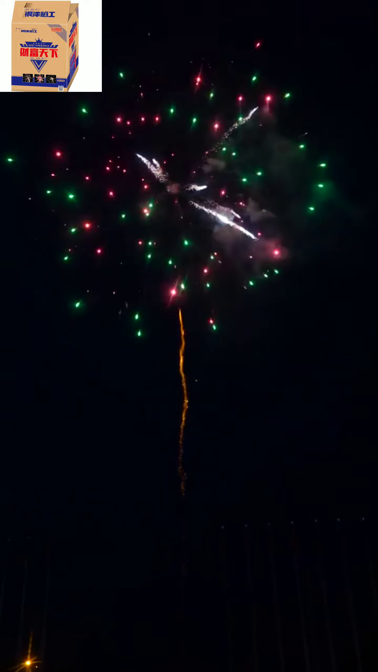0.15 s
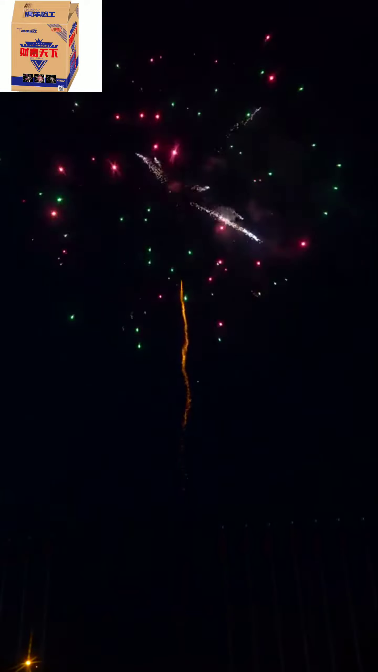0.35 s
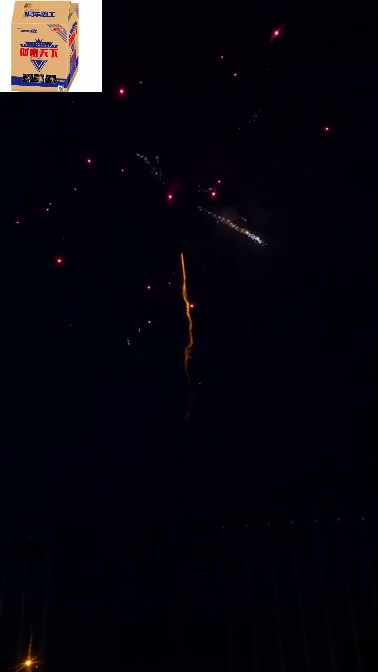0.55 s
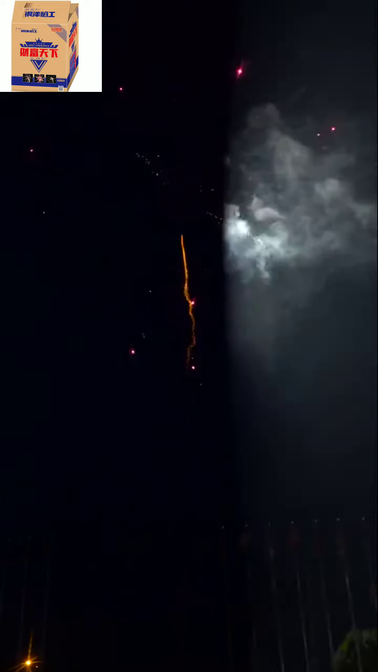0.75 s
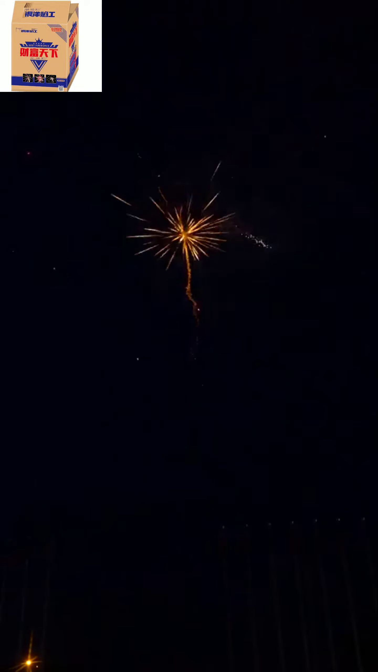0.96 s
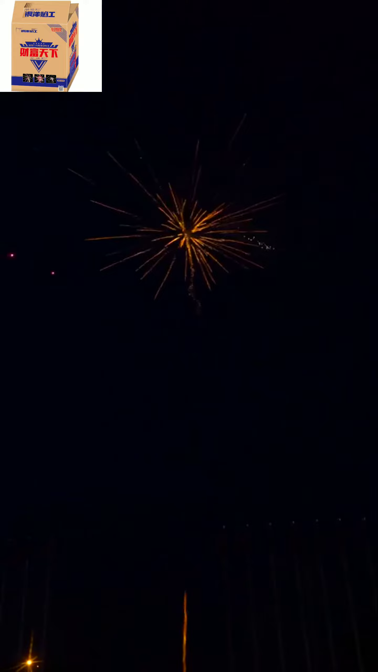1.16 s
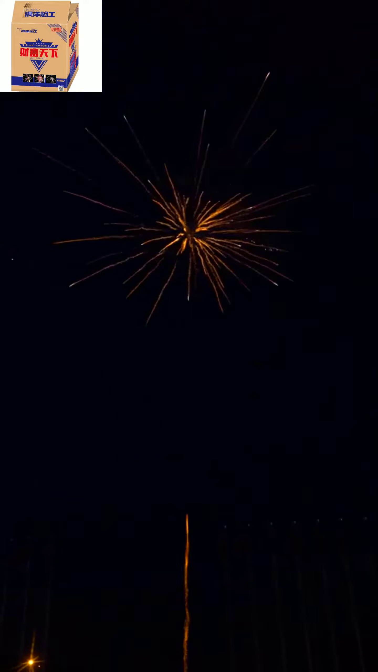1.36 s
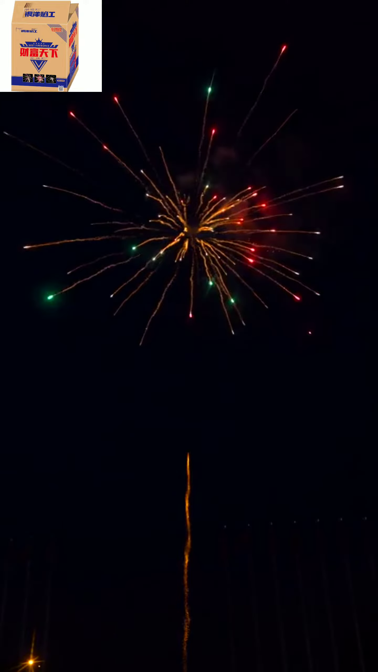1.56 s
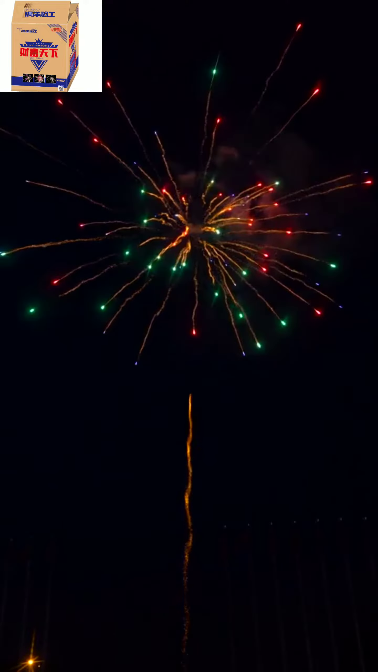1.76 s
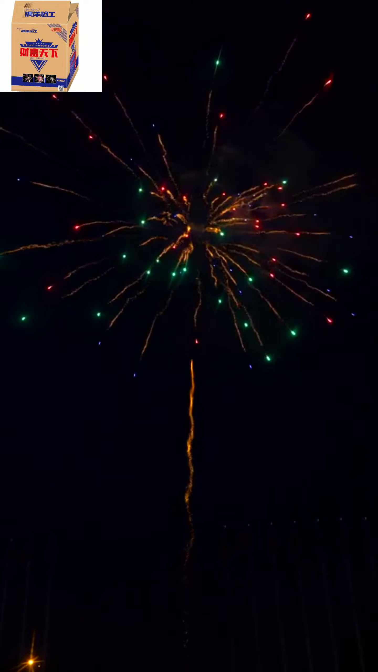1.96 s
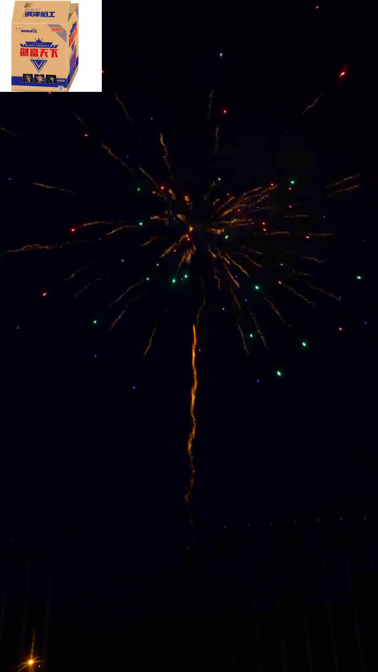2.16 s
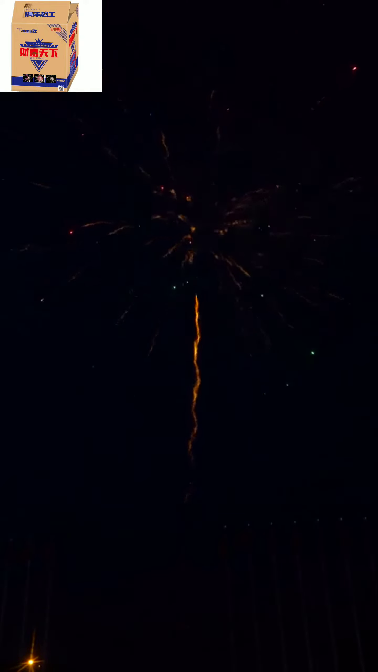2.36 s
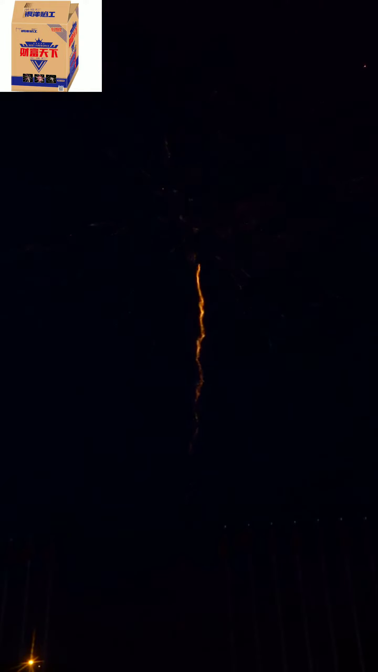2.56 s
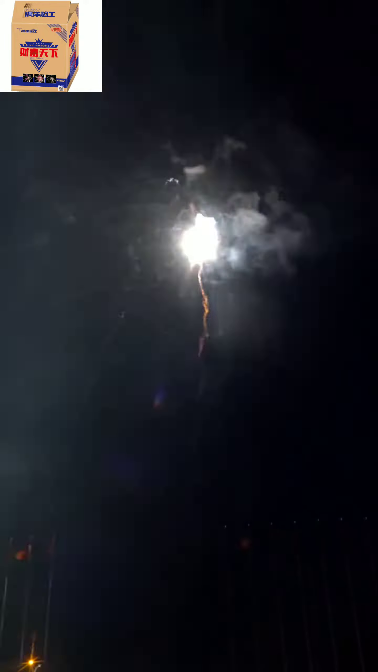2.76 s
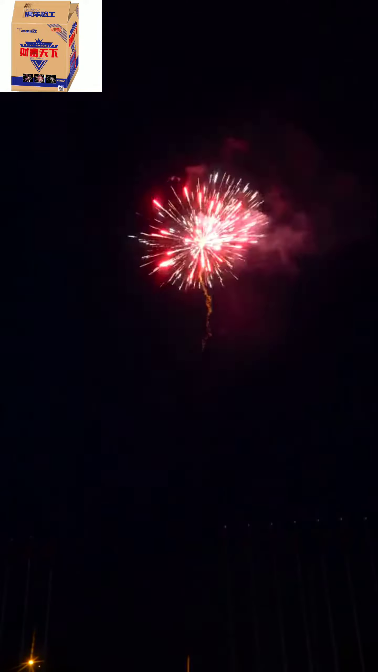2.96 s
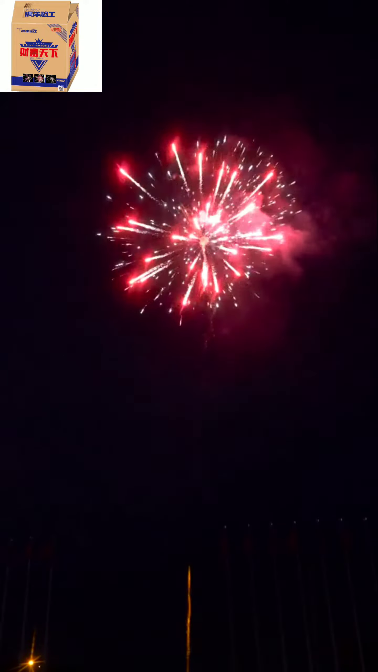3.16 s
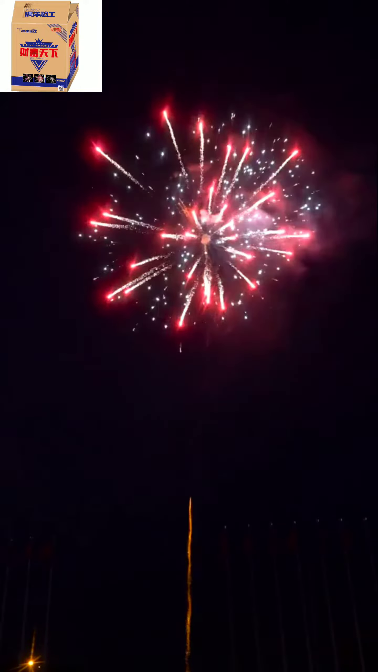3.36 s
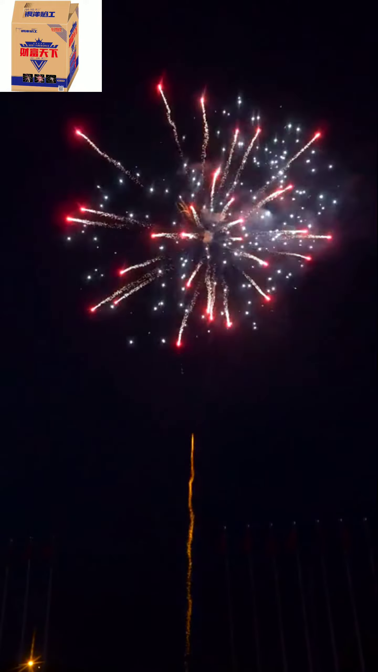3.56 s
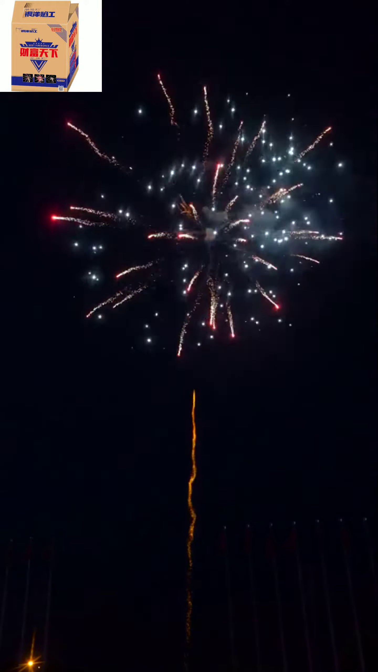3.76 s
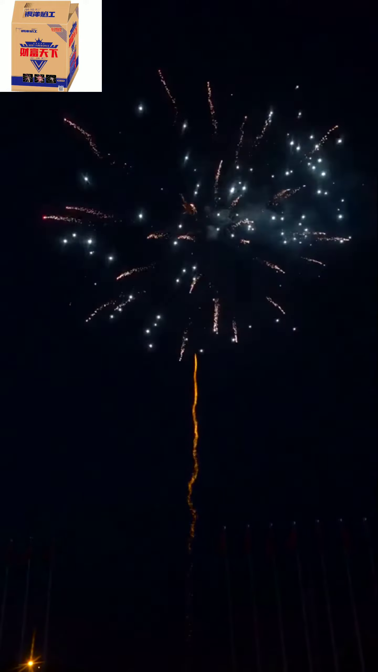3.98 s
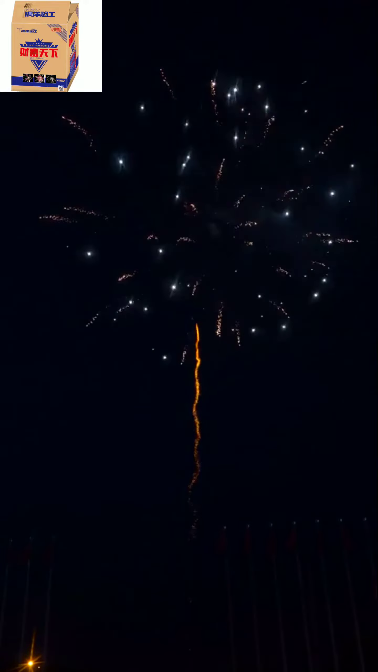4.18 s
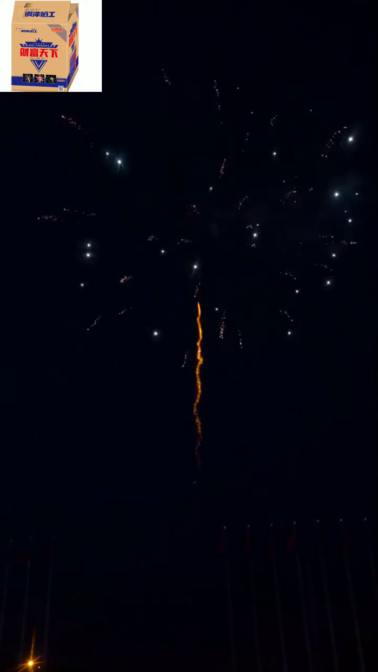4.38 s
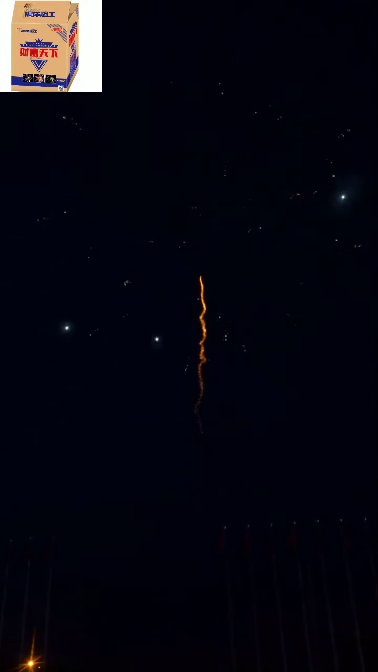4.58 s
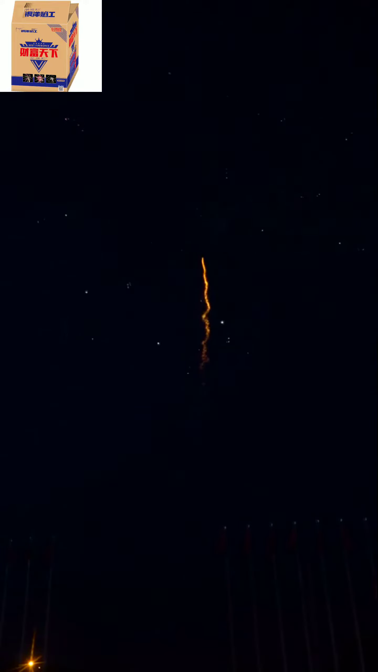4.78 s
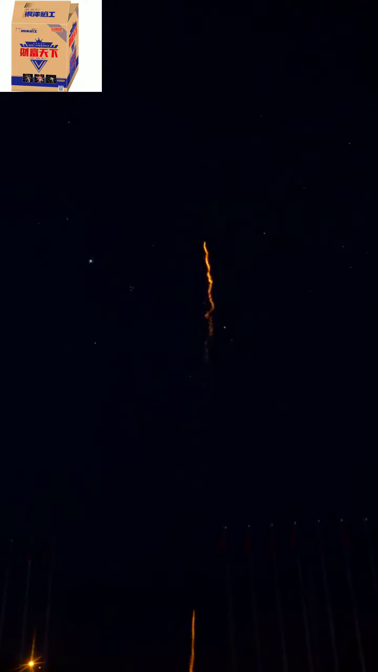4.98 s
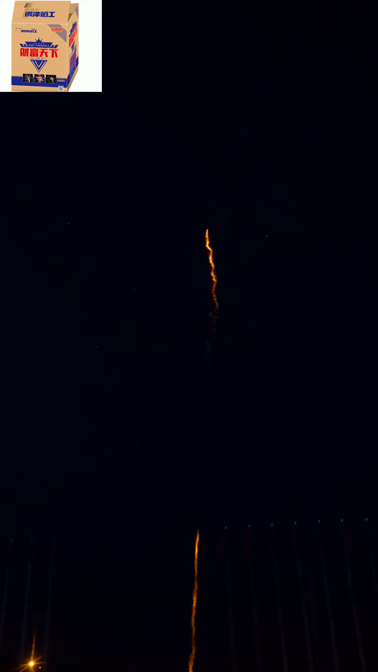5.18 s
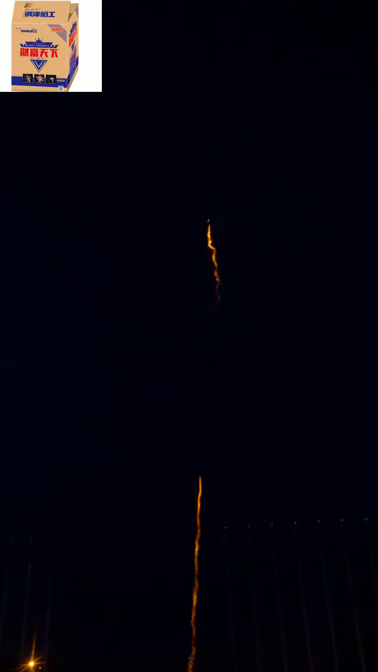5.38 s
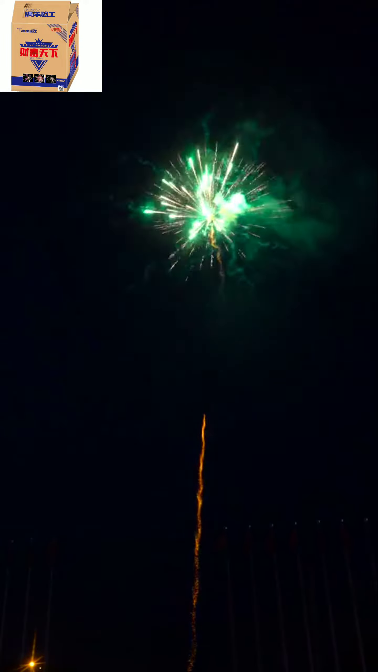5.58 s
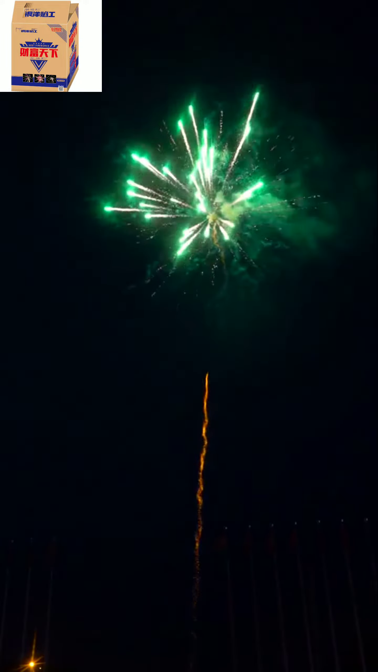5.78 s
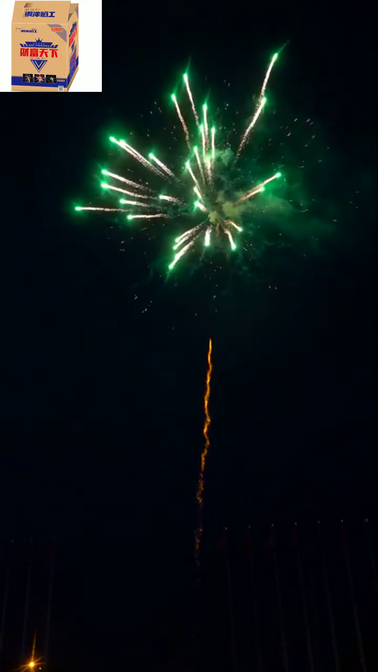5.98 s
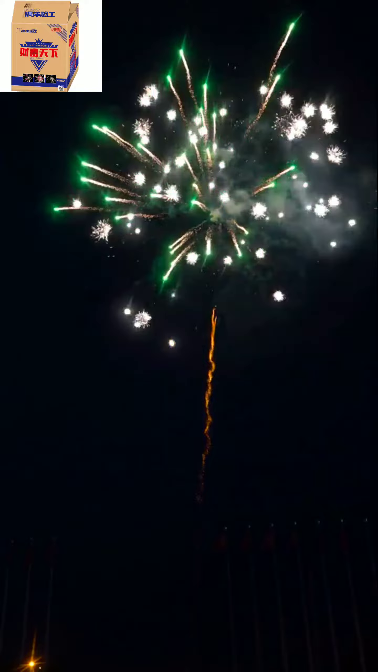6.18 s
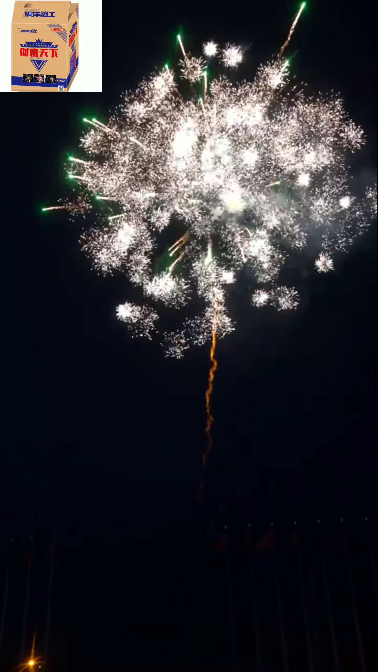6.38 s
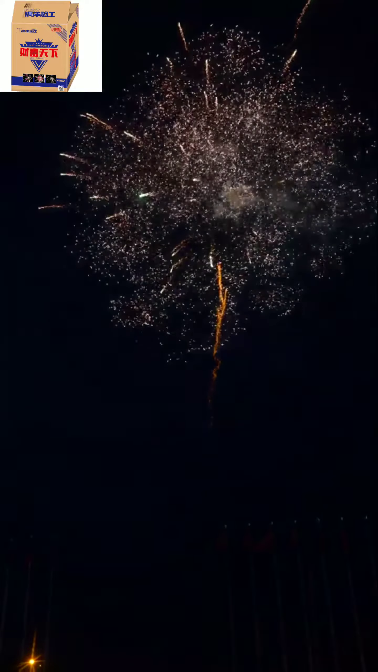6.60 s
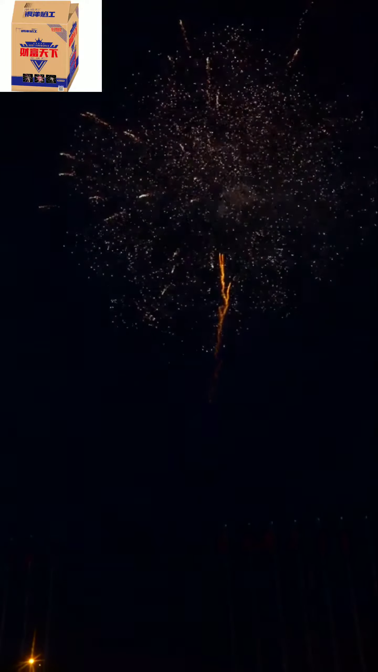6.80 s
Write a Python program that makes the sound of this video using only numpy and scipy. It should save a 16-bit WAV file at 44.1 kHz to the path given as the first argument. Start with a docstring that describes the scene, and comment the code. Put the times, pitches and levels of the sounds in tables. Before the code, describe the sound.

Three sharp firework bangs go off overhead in the open air, after the fading tail of an earlier one. The first two come right on top of a launch thump, while the third follows its thump after a short gap. Each echoes quickly off nearby surfaces and rolls away, and a rush of crackling pops closes the sequence. Distant fireworks, a faint engine drone and low outdoor rumble lie behind.

```python
"""A firework cake at night. First a shell's bang rolls away and its stars sizzle, over low outdoor rumble,
far fireworks and a distant engine slowly gaining speed. Three times a lift charge thumps in its tube,
and three more shells burst overhead. The same walls and trees slap each shock back before it rolls
away over the landscape; stray stars snap in between. The last shell ends in a cloud of crackling stars."""
import sys
import numpy as np
from scipy import signal
from scipy.io import wavfile
from scipy.ndimage import uniform_filter1d

SR = 44100
rng = np.random.default_rng(int(sys.argv[2]) if len(sys.argv) > 2 else 0)


def bounce(signal):
    """Save signal as a 16-bit WAV file at the path given by the first command-line argument."""
    frames = np.transpose(np.atleast_2d(signal))
    limited = np.clip(frames, -1, 1)
    pcm = np.round(limited * 32767).astype(np.int16)
    wavfile.write(sys.argv[1], SR, pcm)


N = 301628

# Source spectra: (frequency [Hz], relative level [dB])
RUMBLE_SPECTRUM = [(25, -34.5), (50, -33.5), (80, 0.5), (150, 5.5), (260, 1), (450, -15), (700, -11),
                   (1100, -16), (2000, -24.5), (4000, -36.5), (5500, -47.5), (7500, -43.5), (9000, -54)]
SIZZLE_SPECTRUM = [(1000, -19), (3500, 4), (5500, -5), (8000, -4), (10000, -26)]
SNAP_SPECTRUM = [(200, -25), (1200, -2), (2500, 2), (6000, 0), (8500, -6.5), (10000, -26)]
POP_SPECTRUM = [(100, -29), (400, -1.5), (700, -1), (1100, -0.5), (2100, -3), (3200, -7.5), (5000, -13.5),
                (8000, -17), (10000, -33)]
LIFT_CRACK_SPECTRUM = [(100, -16.5), (500, 2.5), (1200, 6), (2200, 3.5), (3200, -2.5), (6000, -14),
                       (8300, -8), (10000, -34)]
BURST_CRACK_SPECTRUM = [(100, -11), (500, 12), (1900, 2.5), (3000, -7.5), (6000, -12), (8500, -10.5),
                        (10000, -23)]
# Echo spectra: (frequency [Hz], relative level [dB])
FAR_ROLL_SPECTRUM = [(40, -24), (130, 2), (250, 7.5), (450, -3), (1300, -18), (2500, -35.5), (6000, -59)]
LIFT_ROLL_SPECTRUM = [(15, -55), (25, -55), (83, -3.5), (177, 1.5), (470, -17.5), (546, -10.5), (836, -16),
                      (948, -16), (1070, -11.5), (1690, -19.5), (7400, -34.5), (10000, -49), (13000, -87),
                      (22000, -120)]
BURST_ROLL_SPECTRUM = [(15, -36), (25, -45), (75, -9.5), (168, 2), (264, 4.5), (414, -7.5), (470, -9.5),
                       (756, -10), (972, -16.5), (1250, -16), (2520, -25), (7980, -34), (8820, -35.5),
                       (10000, -53), (13000, -81), (22000, -120)]
SLAP_SPECTRUM = [(100, -15.5), (500, 6), (1900, 0), (3000, -5.5), (6000, -4.5), (8500, -1.5), (10000, -17)]
# Decay of near surroundings and far landscape: (frequency [Hz], T60 [s])
NEAR_T60 = [(60, 1.86), (250, 1.1), (1000, 1.18), (4000, 1.24), (9000, 0.89)]
FAR_T60 = [(60, 3.9), (250, 2.94), (1000, 3.62), (2500, 3.43), (5000, 2.19), (9000, 1.18)]
# Diffuse field width, and the extra for near echoes: (frequency [Hz], side minus mid [dB])
FIELD_WIDTH = [(60, -39.5), (140, -42), (280, -23.5), (560, -11), (1100, -8), (2200, -4), (4500, -0.5),
               (7700, -10)]
NEAR_EXTRA_WIDTH = [(60, 14.5), (140, 26), (280, 14), (560, 6), (1100, 2.5), (2200, 5.5), (4500, 2.5),
                    (7700, -0.5)]
# Near echoes, mostly from the right: (frequency [Hz], left minus right [dB])
NEAR_BALANCE = [(60, 0), (280, -3.5), (700, -5), (1200, -4.5), (2200, 3), (4500, -0.5), (7700, -4.5)]
# Engine loudness, drifting with the air: (time [s], level [dB])
ENGINE_LEVEL = [(0, -38.5), (.9, -35.5), (1.6, -41), (3.0, -39), (4.4, -44), (4.9, -41), (5.6, -53.5),
                (6.84, -46)]
# Far fireworks, and one small, nearer pop at 2.97 s: (time [s], blast [dB], push [s], low-pass [Hz], roll [dB])
FAR_BANGS = [(0.831, -21.5, 0.0026, 380, -41.5), (2.311, -22, 0.0035, 320, -46),
             (2.97, -26, 0.00074, 2500, -34.5), (4.607, -19.5, 0.0061, 480, -42.5),
             (5.459, -26, 0.0015, 700, -56), (5.528, -29, 0.0012, 700, -52)]
# Stray stars, and stars ahead of the cloud: (time [s], level [dB], left minus right [dB])
SNAPS = [(2.848, -43, -3), (2.854, -47, -9), (3.6469, -17, 2)]
EARLY_POPS = [(6.3892, -10.5, -4), (6.3952, -15, 10), (6.4201, -9, -2), (6.4222, -9, -6), (6.4253, -8, 16),
              (6.4457, -10, 6), (6.459, -7, -14)]
# Lift charges: (time [s], blast [dB], push [s], base crack [dB], slap re blast [dB], roll [dB])
LAUNCHES = [(1.0677, -11, 0.002, -11.5, -6, -24.5), (3.0006, -11, 0.004, -11, 1, -25),
            (4.957, -12.5, 0.0027, -11, 2, -23.5)]
# Shell bursts: (time [s], blast [dB], push [s], base crack [dB], roll [dB], roll tilt [dB/octave],
# roll hold [s], far echo re near [dB], far wall delay [s])
BURSTS = [(-.36, -4, .0012, -24, -16, 0.3, 0.17, -5, .28),
          (1.091, -7, 0.0012, -16, -16, 0.47, 0.18, -6, .279),
          (3.074, -5.5, 0.0013, -17, -15.5, 0.64, 0.2, -6, .272),
          (5.7035, -5.5, 0.00096, -15.5, -15, 0.65, 0.21, -6, 0.29)]
# Surfaces answering each lift: (delay [s], thump offset [dB], crack offset [dB])
LIFT_ECHOES = [(0.0802, -18.5, -15), (.111, -9.5, -10.5), (.128, -5.5, -2), (.165, -7.5, -16)]
# Surfaces answering each burst: (delay [s], thump offset [dB], crack offset [dB], crack low-pass [Hz],
# smear [s], left minus right [dB])
BURST_ECHOES = [(.008, -24.5, -16.5, 6070, 0.033, 2.5), (.031, -4, -4.5, 4800, 0.012, 2),
                (.058, -14.5, 2, 11000, 0.003, -4.5), (0.0877, -5.5, 0, 6460, 0.0016, -3),
                (.102, -5, -5, 5500, .003, -9), (.1285, -4, -0.5, 3210, 0.0021, -7),
                (.154, -10, 3.5, 2700, 0.0038, 6)]
# Far wall answering each burst: (thump offset [dB], crack offset [dB], crack low-pass [Hz])
WALL_ECHO = (-3.5, 5.3, 870)


def amp(db):
    return 10 ** (np.asarray(db) / 20)


def unit_rms(x):
    return x / np.sqrt(np.mean(x ** 2) + 1e-20)


def at_hz(table, hz):
    table_hz, value = np.transpose(table)
    return np.interp(np.log(hz + 1), np.log(table_hz + 1), value)


def pan(balance_db):
    return amp(np.array([[balance_db], [-balance_db]]) / 2)


def add(mix, at_s, sound):
    start = round(at_s * SR)
    sound = sound[:, max(-start, 0):]
    part = mix[:, max(start, 0):][:, :sound.shape[1]]
    part += sound[:, :part.shape[1]]


def click(spectrum, size=2048):
    """Minimum-phase pulse, peak 1."""
    hz = abs(np.fft.fftfreq(size, 1 / SR))
    log_gain = np.log(amp(at_hz(spectrum, hz)))
    pulse = np.fft.ifft(np.exp(np.conj(signal.hilbert(log_gain)))).real[:size // 2]
    return pulse / abs(pulse).max()


def diffuse(pair, gain, near_s=0.):
    """Two unrelated signals shaped by gain(hz, s) into a field with near-mono bass; wider for near_s."""
    hz, t, (mid, side) = signal.stft(pair, SR, nperseg=1024, noverlap=768)
    hz = hz[:, None]
    nearness = np.exp(-(t / near_s) ** 2) if near_s else 0 * t
    width = amp(at_hz(FIELD_WIDTH, hz) + nearness * at_hz(NEAR_EXTRA_WIDTH, hz))
    lean = amp(nearness * at_hz(NEAR_BALANCE, hz) / 2)
    field = np.array([(mid + width * side) * lean, (mid - width * side) / lean]) / np.sqrt(1 + width ** 2)
    return signal.istft(field * gain(hz, t), SR, nperseg=1024, noverlap=768)[1][:, :pair.shape[1]]


def blast(db, push_s, top_hz, low_cut_hz=125):
    """Shock front and suction, rounded by the air; a steep bass cut rings on for a cycle."""
    age = np.arange(SR // 20) / SR / push_s
    bass_cut = signal.butter(3, low_cut_hz, "high", fs=SR, output="sos")
    wave = signal.sosfilt(bass_cut, (1 - age) * np.exp(-age))
    wave = signal.lfilter(*signal.butter(2, top_hz, fs=SR), wave)
    return amp(db) * wave[None] / abs(wave).max()


def crack(db, fade_s, spectrum=BURST_CRACK_SPECTRUM, size=SR // 25):
    """A shock shattered into milliseconds of sharp ripples."""
    t = np.arange(size) / SR
    ripples = signal.fftconvolve(rng.standard_normal((2, size)), click(spectrum)[None], axes=1)[:, :size]
    return amp(db) * unit_rms(ripples + 0.076 * ripples[::-1]) * np.exp(-t / fade_s)


def roll(spectrum, db, tilt_db_per_oct, rise_s, hold_s, far_db, grain_db):
    """Countless small echoes build, hold while near objects answer, then die over the landscape."""
    t = np.arange(3 * SR) / SR
    sizes = amp(grain_db * np.clip(rng.standard_normal(len(t)), -2, 2) / (1 + t / .5))
    density = np.minimum(.12 + t / 2, 1)
    taps = rng.standard_normal((2, len(t))) * (rng.random(len(t)) < density) * sizes
    taps /= np.sqrt(uniform_filter1d((taps ** 2).mean(0), 2000))

    def gain(hz, s):
        age_s = np.maximum(s - hold_s / (1 + hz / 14000), 0)  # air takes the treble first
        near = amp(-60 * age_s / at_hz(NEAR_T60, hz))
        far = amp(far_db - 60 * age_s / at_hz(FAR_T60, hz))
        # Large surfaces return lumps of bass and middle; crossing paths ripple the spectrum.
        lumps_db = -1.7 * unit_rms(uniform_filter1d(rng.standard_normal(len(s)), 3)) / (1 + hz / 3000)
        ripples = uniform_filter1d(rng.standard_normal((len(hz), len(s))), 4, axis=0)
        ripples_db = 1.58 * unit_rms(uniform_filter1d(ripples, 14, axis=1))
        shape = unit_rms(amp(at_hz(spectrum, hz) + tilt_db_per_oct * np.log2(hz + 1)))
        return shape * np.hypot(near, far) * amp(lumps_db + ripples_db)
    return amp(db) * diffuse(taps, gain, near_s=0.55) * (1 - np.exp(-(t / rise_s) ** 2))


def rumble(swell, db=-40, swell_db=0.71):
    """Low outdoor noise, swelling a little."""
    noise = diffuse(rng.standard_normal((2, N)), lambda hz, s: amp(at_hz(RUMBLE_SPECTRUM, hz)))
    return unit_rms(noise) * amp(db + swell_db * swell)


def engine(waver, start_hz=75.8, climb_hz_per_s=2.85, top_hz=90, waver_db=2):
    """Far exhaust note: climbs steadily, then levels off."""
    t = np.arange(N) / SR
    hz = np.minimum(start_hz + climb_hz_per_s * t, top_hz)
    phase = 2 * np.pi * np.cumsum(hz) / SR
    exhaust = unit_rms(np.sin(phase) + amp(-15) * np.sin(2 * phase))
    return exhaust * amp(np.interp(t, *np.transpose(ENGINE_LEVEL)) + waver_db * waver)


def far_bangs():
    """Distant shells, dulled by the air, and one small, brighter pop close by."""
    out = np.zeros((2, N))
    for s, db, push_s, top_hz, roll_db in FAR_BANGS:
        add(out, s, blast(db, push_s, top_hz))
        add(out, s, roll(FAR_ROLL_SPECTRUM, roll_db, tilt_db_per_oct=2,
                         rise_s=.0027, hold_s=.018, far_db=-29, grain_db=6))
    return out


def sizzle(db=-64, burn_s=1.6, sparks_per_s=2500):
    """Sparks from the first shell's stars, fading as they burn out."""
    t = np.arange(N) / SR
    sparks = rng.standard_normal((2, N)) * (rng.random(N) < sparks_per_s / SR)
    fizz = unit_rms(diffuse(sparks, lambda hz, s: amp(at_hz(SIZZLE_SPECTRUM, hz))))
    return amp(db) * fizz * np.exp(-(t / burn_s) ** 2)


def snaps(ground_s=.0046, ground_db=-11):
    """Stray stars: one click each, plus its ground bounce."""
    out, snap = np.zeros((2, N)), click(SNAP_SPECTRUM)
    for s, db, balance_db in SNAPS:
        add(out, s, pan(balance_db) * amp(db) * snap)
        add(out, s + ground_s, pan(balance_db) * amp(db + ground_db) * snap)
    return out


def crackle(start_s=6.428, peak_s=6.59, rise_s=.088, thin_s=.105, peak_pops_per_s=3400,
            pop_db=-13.5, fade_db_per_s=50, echo_db=-5):
    """Stars pop across the sky, ever faster, then thin out; late pops are far-side ones, so fainter."""
    t = np.arange(N) / SR
    before_s, after_s = np.maximum(peak_s - t, 0), np.maximum(t - peak_s, 0)
    pops_per_s = peak_pops_per_s * np.exp(-before_s / rise_s - after_s / thin_s) * (t > start_s)
    fires = rng.random(N) < pops_per_s / SR
    strength, direction = np.clip(rng.standard_normal((2, N)), -1.6, 1.6)[:, fires]
    levels_db = pop_db - fade_db_per_s * after_s[fires] + 2.5 * strength
    cloud = zip(t[fires], levels_db, 6 * direction)
    pops, pop = np.zeros((2, N)), np.pad(click(POP_SPECTRUM), 16)
    for s, db, balance_db in [*EARLY_POPS, *cloud]:
        lead = int(np.clip(balance_db / 2, -6, 6))  # samples; the nearer side hears it first
        add(pops, s, amp(db) * pan(balance_db) * np.array([np.roll(pop, -lead), np.roll(pop, lead)]))
    tail = diffuse(rng.standard_normal((2, SR)), lambda hz, s: amp(-60 * s / at_hz(NEAR_T60, hz)))
    tail *= 1 - np.exp(-t[:SR] / .02)
    echoes = signal.fftconvolve(pops, tail / np.linalg.norm(tail[0]), axes=1)[:, :N]
    return pops + amp(echo_db) * echoes


def slap(db, crack_db, edge_hz, smear_s, balance_db, rise_s=.0024):
    """A wall or tree returns a thump with a splintered edge: duller from afar, smeared by foliage."""
    t = np.arange(SR // 10) / SR
    edge = crack(crack_db + 6, smear_s, SLAP_SPECTRUM, size=len(t))
    out = signal.lfilter(*signal.butter(2, edge_hz, fs=SR), edge) * (1 - np.exp(-t / rise_s))
    add(out, 0, blast(db, push_s=.0011, top_hz=626))
    return pan(balance_db) * out


def surface_echoes(vary_db=4.5, delay_spread=.006):
    """The same surfaces answer every bang; each shell's position shifts its echoes a little."""
    out = np.zeros((2, N))
    for s, db, _, crack_db, *_, wall_s in BURSTS:
        for delay_s, thump_db, edge_db, *surface in BURST_ECHOES:
            late, loud = rng.uniform(-1, 1, 2)
            echo = amp(vary_db * loud) * slap(db + thump_db, crack_db + edge_db, *surface)
            add(out, s + delay_s * (1 + delay_spread * late), echo)
        thump_db, edge_db, edge_hz = WALL_ECHO
        echo = slap(db + thump_db, crack_db + edge_db, edge_hz, smear_s=.0039, balance_db=0)
        add(out, s + wall_s, echo)
    for s, db, _, crack_db, *_ in LAUNCHES:
        for delay_s, thump_db, edge_db in LIFT_ECHOES:
            echo = slap(db + thump_db, crack_db + edge_db, edge_hz=1800, smear_s=.0021, balance_db=-3)
            add(out, s + delay_s, echo)
    return out


def launches(tube_hz=165, crack_s=.0023, spit_s=.009, wall_s=.0322, ground_s=.005):
    """A spit of flame swells into the lift charge; the tube hums; wall and ground slap back."""
    t = np.arange(SR // 20) / SR
    tube = np.sin(2 * np.pi * tube_hz * t) * np.exp(-t / .044)
    spit_swell = 1 - np.exp(-t[:SR // 25] / .0035)
    out = np.zeros((2, N))
    for s, db, push_s, crack_db, slap_db, roll_db in LAUNCHES:
        add(out, s - spit_s, crack(crack_db - 11, .021, LIFT_CRACK_SPECTRUM) * spit_swell)
        add(out, s, pan(8.1) * crack(crack_db - 1.5, crack_s, LIFT_CRACK_SPECTRUM))
        add(out, s, blast(db, push_s, top_hz=330))
        add(out, s + .009, amp(db - 6) * tube[None])
        add(out, s + wall_s, crack(crack_db - 2.5, crack_s, LIFT_CRACK_SPECTRUM))
        add(out, s + wall_s, blast(db + slap_db, push_s, top_hz=290))
        add(out, s + wall_s + ground_s, blast(db + slap_db, push_s, top_hz=220))
        add(out, s, roll(LIFT_ROLL_SPECTRUM, roll_db, tilt_db_per_oct=0,
                         rise_s=.048, hold_s=.17, far_db=-7, grain_db=-.5))
    return out


def bursts(ground_s=.0048, lull_s=.065, hill_s=.655, hill_db=-20.5):
    """Each shell's shock comes from above, off the ground, off everything around, last off a hillside."""
    out = np.zeros((2, N))
    for s, db, push_s, crack_db, roll_db, tilt_db_per_oct, hold_s, far_db, _ in BURSTS:
        add(out, s, pan(-3) * blast(db, push_s, top_hz=650))
        add(out, s, crack(crack_db + 5, fade_s=.001) + crack(crack_db - 6.5, fade_s=.007))
        add(out, s + ground_s, pan(3.9) * blast(db - 3, push_s, top_hz=377))
        add(out, s + ground_s, crack(crack_db, fade_s=.0015))
        add(out, s, roll(BURST_ROLL_SPECTRUM, roll_db, tilt_db_per_oct,
                         lull_s, hold_s, far_db, grain_db=1.5))
        add(out, s + hill_s, roll(BURST_ROLL_SPECTRUM, roll_db + hill_db, tilt_db_per_oct=-.73,
                                  rise_s=.021, hold_s=.037, far_db=-20, grain_db=3))
    return out


def scene():
    fireworks = launches() + bursts() + surface_echoes() + far_bangs() + snaps() + crackle()
    swell, waver = unit_rms(uniform_filter1d(uniform_filter1d(rng.standard_normal((2, N)), 4000), 2000))
    return fireworks + rumble(swell) + engine(waver) + sizzle()


def record(dry):
    """Soft peak limit, then low-pass."""
    ceiling, top_hz = .9, 10200
    rounded = dry / (1 + (dry / ceiling) ** 4) ** .25
    low_pass = signal.firwin(301, top_hz, window=("kaiser", 9), fs=SR)
    return signal.oaconvolve(rounded, low_pass[None], "same")


dry = scene()
out = record(dry)
bounce(out)
```